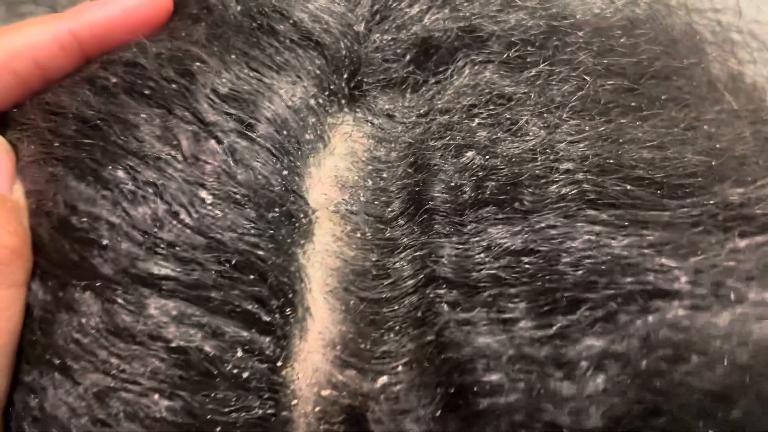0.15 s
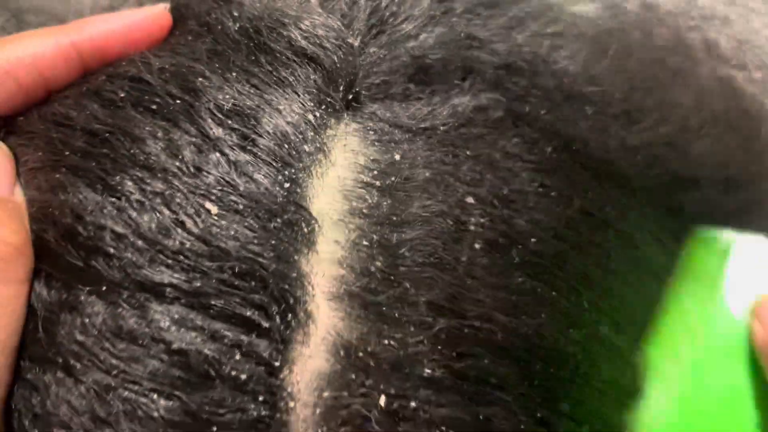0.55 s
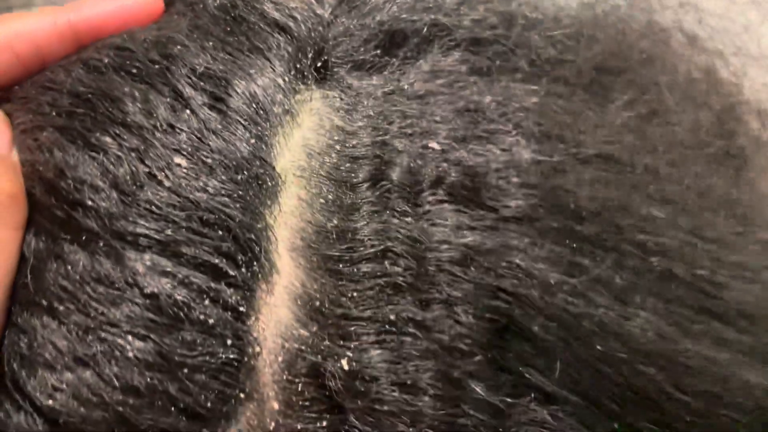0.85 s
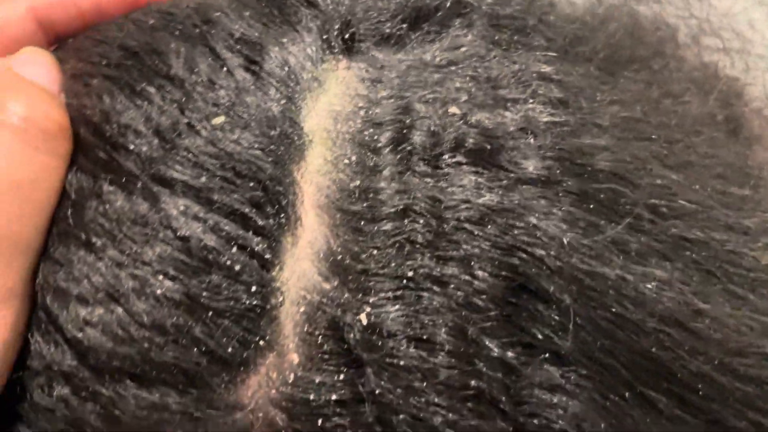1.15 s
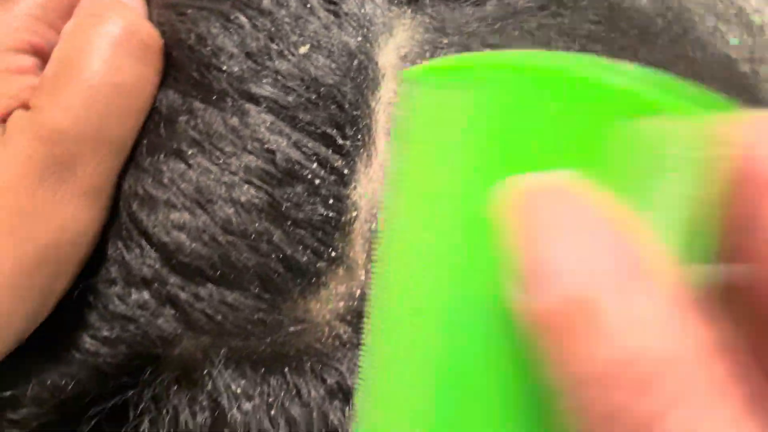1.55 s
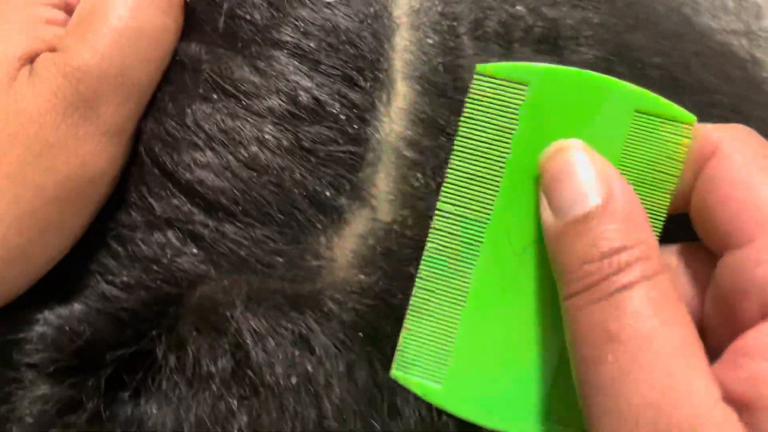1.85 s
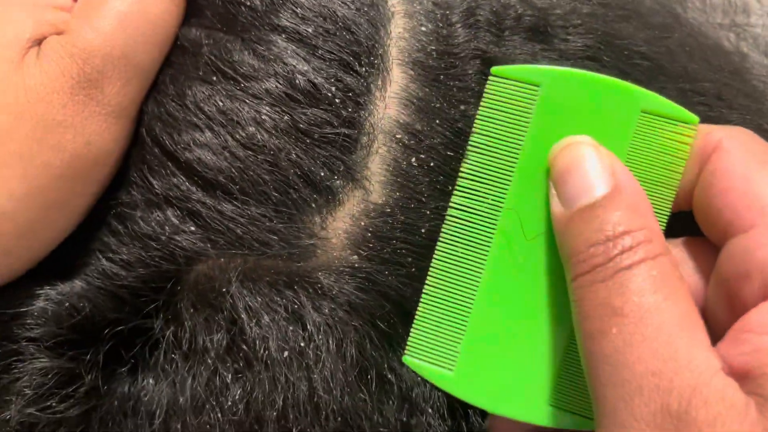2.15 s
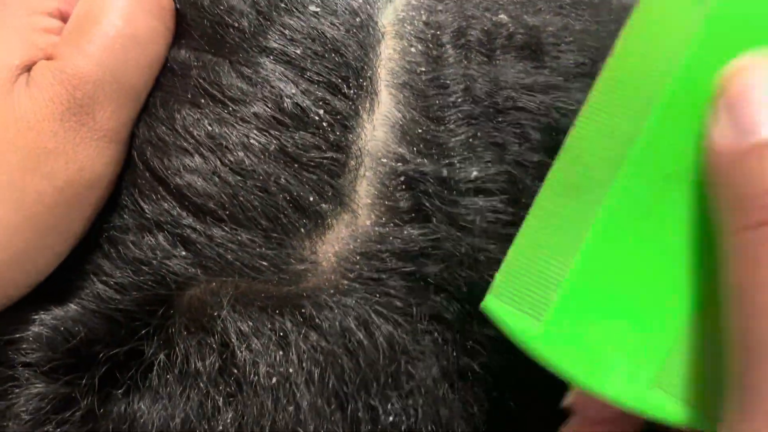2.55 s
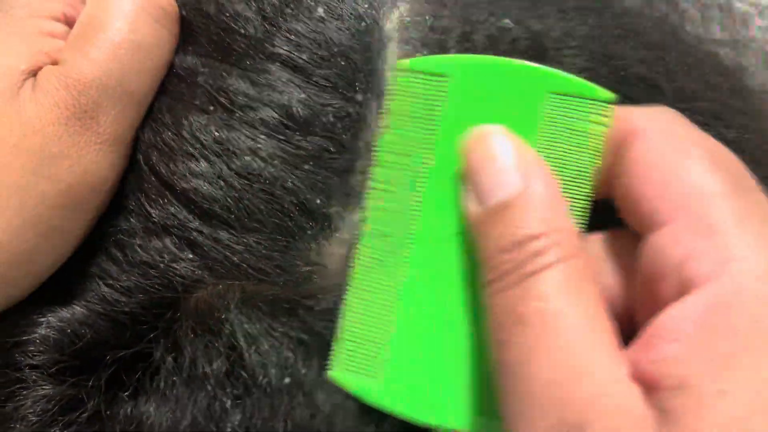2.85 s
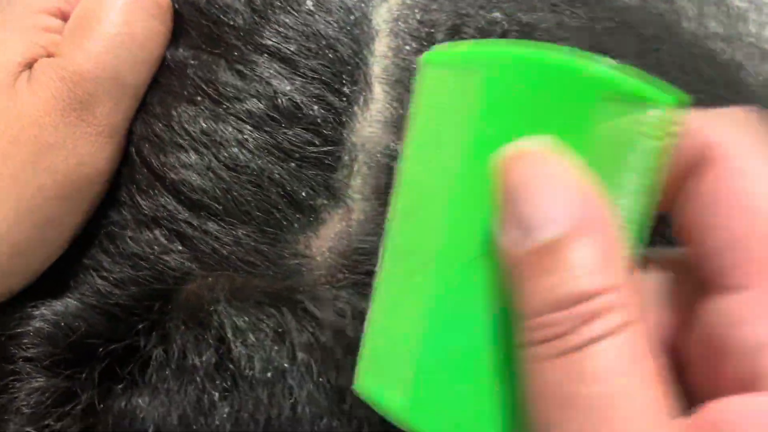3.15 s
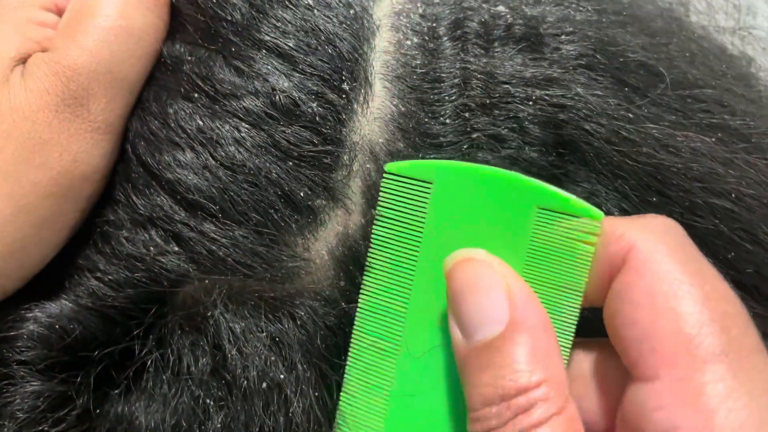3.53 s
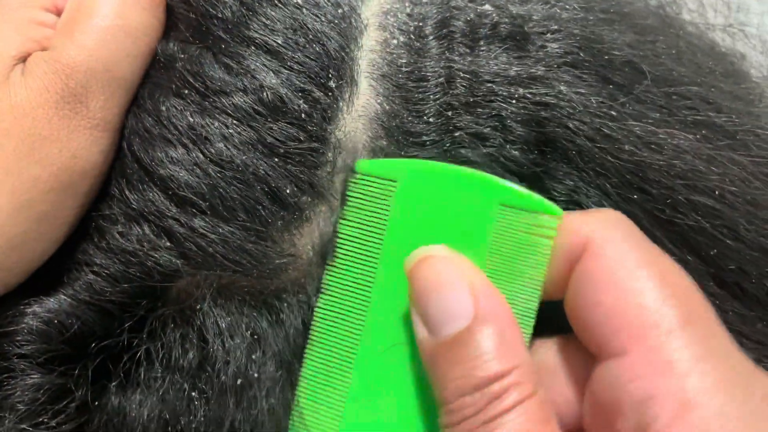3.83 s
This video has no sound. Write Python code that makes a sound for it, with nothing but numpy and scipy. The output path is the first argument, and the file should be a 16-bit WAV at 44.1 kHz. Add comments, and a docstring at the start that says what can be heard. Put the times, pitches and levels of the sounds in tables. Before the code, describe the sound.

A fine plastic comb makes one soft swishing pull through hair, then two brief, clicky scratches on the scalp with faint touches between, heard very close in stereo in a quiet room with low hum and hiss.

```python
"""In a quiet room, a fine plastic comb is drawn through hair, then scratches twice over the scalp.
Between these, hair brushes lightly and fainter touches follow. Hair and teeth are made of many random
clicks, coloured by filters and placed at two nearby microphone openings. The room is shaped noise for a
dull hiss, a passing rumble and far traffic, plus two low sine hums that waver in pitch and level."""
import sys
import numpy as np
from scipy import signal
from scipy.fft import rfft, irfft, next_fast_len
from scipy.io import wavfile
from scipy.ndimage import uniform_filter1d

SR = 44100
rng = np.random.default_rng(int(sys.argv[2]) if len(sys.argv) > 2 else 0)


def transcribe(signal):
    """Save signal, clipped to [-1, 1], as a 16-bit WAV file at the path in sys.argv[1]."""
    frames = np.atleast_2d(signal).T
    limited = np.clip(frames, -1, 1)
    pcm = np.round(limited * 32767).astype(np.int16)
    wavfile.write(sys.argv[1], SR, pcm)


N = 175959  # length in samples
FFT_SIZE = next_fast_len(N + 8192)  # room for phase shifts to spread past the end

# Tone tables give relative strength only: the sound is brought to a standard strength afterwards.
# Dull hiss of the room: pitch_hz, relative_db
HISS_TONE = [(22, -44), (32, -26), (50, -10.5), (72, -2.5), (94, -6.5), (130, -11), (249, -10.5),
             (451, -12), (548, -14.5), (590, -17.5), (1040, -27), (1290, -25.5), (1890, -34), (2760, -40),
             (3250, -48), (6380, -53.5), (7500, -59.5), (10000, -65.5), (12200, -67), (13300, -80),
             (15500, -74)]
# Passing rumble, loudness over time: time_s, level_db
RUMBLE_LEVEL = [(0.0, -70), (.7, -60.5), (1.0, -55), (1.3, -52), (1.7, -65.5), (2.1, -72), (3.99, -83.5)]
# Passing rumble, tone: pitch_hz, relative_db
RUMBLE_TONE = [(30, -41), (45, 3.5), (65, -7), (90, 19), (120, 13), (170, -4), (260, -51)]
# Far traffic, loudness over time: time_s, level_db
FAR_TRAFFIC_LEVEL = [(0.0, -60), (.6, -59.5), (1.3, -69.5), (2.1, -67), (3.3, -71.5), (3.99, -61.5)]
# Far traffic, tone: pitch_hz, relative_db
FAR_TRAFFIC_TONE = [(90, -40), (150, 4), (300, 17.5), (540, 4.5), (600, -2.5), (1500, -48)]
# Room noise at the two openings: pitch_hz, left_minus_right_db, likeness (-1 to 1)
ROOM_PORTS = [(40, -1.5, .8), (125, -2.8, .55), (300, -2.2, .25), (600, -2.2, -.3), (1000, -3.5, -.5),
              (2000, -5, -.3), (4000, -6, .15), (7000, -5, .1), (8500, -2, -.1), (10500, -1.5, .75),
              (12800, -1.5, -.1), (15500, -1.5, .55)]
# Lower hum, loudness over time: time_s, level_db
LOW_HUM_LEVEL = [(0.0, -66), (0.07, -57), (0.39, -51), (0.78, -67), (0.87, -54), (1.57, -57.5), (1.93, -54),
                 (2.02, -63.5), (2.23, -61.5), (2.3, -69), (2.549, -53), (2.83, -56), (3.05, -71),
                 (3.589, -53.5), (3.71, -81), (3.99, -56)]
# Higher hum, loudness over time: time_s, level_db
HIGH_HUM_LEVEL = [(0.0, -52.5), (0.18, -43.5), (0.34, -64), (0.44, -43), (0.65, -55.5), (0.71, -45),
                  (0.99, -48.5), (1.04, -61.5), (1.24, -49.5), (1.79, -70), (2.12, -60), (2.18, -84),
                  (2.69, -53.5), (2.81, -75), (3.79, -61.5), (3.99, -79)]
# Loose hair, one curve per touch, before its overall gain: time_s, level_db
BRUSH_LEVELS = [
    [(0, -71), (.026, -70.5), (.075, -85), (.13, -82), (.32, -89.5), (.36, -105)],
    [(.38, -100), (.43, -66), (.72, -73.5), (.83, -72), (.91, -100)],
    [(1.58, -105), (1.615, -90), (1.628, -73), (1.652, -90), (1.68, -94)],
    [(2.34, -103), (2.375, -90), (2.4, -88), (2.44, -73), (2.506, -94), (2.57, -108)],
    [(3.24, -108), (3.286, -87), (3.322, -88), (3.44, -102)],
    [(3.7, -105), (3.832, -84), (3.86, -99), (3.88, -80), (3.95, -98), (3.99, -86)],
]
# Loose hair, tone: pitch_hz, relative_db
BRUSH_TONE = [(1500, -10), (3000, -1), (4500, -21), (6500, 0.5), (8800, -16), (10300, -1.5), (11500, 0.5),
              (13000, -4.5), (15500, 0)]
# Long pull through the hair, before its overall gain: time_s, level_db
STROKE_LEVEL = [(.39, -106), (.44, -65.5), (.5, -53), (.546, -54.5), (.575, -54.5), (.6, -55), (.686, -56),
                (.71, -59.5), (.79, -69.5), (.86, -89)]
# Long pull, tone: pitch_hz, relative_db
STROKE_TONE = [(600, -24), (1100, -7.5), (1600, -6.5), (1950, 3.5), (2300, -4), (2750, -7), (3300, -6.5),
               (4000, -10.5), (5400, -9.5), (6100, 0), (6900, -3), (8000, -13), (10000, -14),
               (13000, -16.5), (15500, -6.5)]
# Long pull, boost of its low band against the rest: time_s, boost_db
STROKE_LOW_BOOST = [(.45, 1), (.51, -2), (.59, 3), (.66, 0.5), (.75, -1)]
# Long pull at the two openings: pitch_hz, left_minus_right_db, left_lead_rad, likeness (0 to 1)
STROKE_PORTS = [(800, 4, 3.5, 0.4), (2140, -8.5, 4.5, 0.78), (3230, -6.5, 1.2, 0.6), (4000, -13, -0.5, .45),
                (5040, -8, -6, 1), (6700, -15, -6, 1), (6850, -7.5, -5, 1), (9100, 2, -2.5, 0.99),
                (9900, 2, -1.8, 1), (9900, -7, 0, .97), (11900, 4.5, 1.5, 1), (13300, -8, 5.5, .97),
                (14300, 5, 2, 1), (15200, -4, 8, 0.9)]
# Teeth on the scalp, one curve per scrape, before the overall gain: time_s, level_db
SCRATCH_LEVELS = [
    [(1.66, -88), (1.702, -61.5), (1.732, -53), (1.768, -61), (1.776, -67.5), (1.795, -65), (1.91, -66.5),
     (1.93, -72), (1.95, -74), (2.02, -94)],
    [(2.4, -87), (2.445, -72.5), (2.5, -79), (2.55, -103)],
    [(2.8, -79), (2.843, -73.5), (2.868, -50.5), (2.905, -55.5), (2.928, -65), (2.946, -64), (2.962, -59),
     (3.01, -71), (3.09, -95)],
    [(3.79, -92), (3.83, -73.5), (3.862, -83), (3.878, -67), (3.9, -72.5), (3.922, -69), (3.948, -79),
     (3.99, -88)],
]
# The comb's own tone: pitch_hz, relative_db
COMB_TONE = [(1000, -28), (1900, -0.5), (2550, -10.5), (3200, 1.5), (4200, 0), (5300, -4), (5900, -8.5),
             (6500, -5), (7300, -11.5), (8300, -8), (9500, -8.5), (12000, -12), (14000, -15), (15600, -5.5)]
# Teeth springing free, before band gains and filters: start_s, peak_db, treble_boost_db
TICKS = [(1.6817, -48, -5), (1.697, -38, -12), (1.704, -45, -5), (1.7093, -42, 7), (1.726, -44, -6),
         (1.7293, -44, -4), (1.7319, -46, 17), (1.744, -42, -3), (1.754, -36, -7), (1.765, -40, 4),
         (1.797, -40, 3), (1.810, -45, -5), (1.814, -46, -6), (1.826, -56, -8), (1.8415, -56, -8),
         (1.8545, -54, -8), (1.858, -45, -3), (1.8807, -45.5, 2), (1.9167, -38, 3.5), (1.943, -55, 10),
         (2.3705, -70, 9), (2.846, -40, -8), (2.858, -38.5, -6), (2.864, -39, -5), (2.869, -33.5, -6),
         (2.874, -44, -12), (2.88, -44, -7), (2.8865, -42, -9), (2.894, -39, -7), (2.898, -37.5, 7),
         (2.902, -41, 5), (2.9097, -42, -3), (2.9527, -38, -10), (2.958, -44, -9), (2.969, -44, -19),
         (3.871, -53, 13), (3.876, -48, 1), (3.912, -55, -4), (3.9254, -45.5, -11), (3.956, -45, -7)]
# Other near sounds at the two openings: pitch_hz, left_minus_right_db, left_lead_rad, likeness (0 to 1)
NEAR_PORTS = [(800, -2, 3.1, .5), (2000, -6, 3.3, .65), (3000, -9, 2.2, .72), (4000, -11, .8, .68),
              (5100, -7, .1, .65), (5700, -4, -.8, .3), (7000, -2, -3.3, .25), (8200, 0, -3.0, .8),
              (10500, 0, 0, .9), (12000, 0, 2.0, .72), (13200, 0, 3.2, .92), (14200, 0, 4.5, .65),
              (15600, 0, 6.3, .92)]


def gain_of(db):
    """Turns decibels into a plain multiplier."""
    return 10 ** (np.asarray(db) / 20)


def evened(x):
    """Scales a signal to an average (RMS) strength of 1."""
    return x / np.sqrt(np.mean(x ** 2) + 1e-20)


def read(points, hz, column=1):
    """Reads a table column at any pitch, with pitch spaced by ratio."""
    table = np.array(points, float)
    return np.interp(np.log(hz + 1), np.log(table[:, 0] + 1), table[:, column])


def level(*curves):
    """Gain over time from one or more level curves, silent outside them."""
    t = np.arange(N) / SR
    total = np.zeros(N)
    for curve in curves:
        time_s, level_db = np.transpose(curve)
        total += gain_of(np.interp(t, time_s, level_db, left=-200, right=-200))
    return uniform_filter1d(total, size=64)


def room_noise(tone, patchy_db):
    """Room sound as random short-time spectra with faint patches, partly alike at the two openings."""
    frames, hz = N // 512 + 5, np.fft.rfftfreq(2048, 1 / SR)
    a, b, c, d, patches = rng.standard_normal((frames, 1025, 5)).T
    patches = uniform_filter1d(patches, size=16, axis=0)  # smooth over pitch
    patches = evened(uniform_filter1d(patches, size=6, axis=1))  # smooth over time
    likeness = np.clip(read(ROOM_PORTS, hz, column=2), -1, 1)[:, None]
    right = a + 1j * b
    left = likeness * right + np.sqrt(1 - likeness ** 2) * (c + 1j * d)
    left = left * gain_of(read(ROOM_PORTS, hz))[:, None]
    spectra = np.array([left, right]) * gain_of(read(tone, hz)[:, None] + patchy_db * patches)
    return evened(signal.istft(spectra, nperseg=2048, noverlap=1536)[1][:, :N])


def hiss():
    """The steady dull hiss of the room: noise that is weaker toward the treble."""
    return gain_of(-52.5) * room_noise(HISS_TONE, patchy_db=1.63)


def traffic():
    """A passing rumble and far traffic: two low noises, each with its own swell."""
    rumble = level(RUMBLE_LEVEL) * room_noise(RUMBLE_TONE, patchy_db=3.5)
    far = level(FAR_TRAFFIC_LEVEL) * room_noise(FAR_TRAFFIC_TONE, patchy_db=2.7)
    return rumble + far


def hum(pitch_hz, curve, waver_hz):
    """A low sine tone whose pitch drifts a little, slightly stronger on the right."""
    drift = uniform_filter1d(rng.standard_normal(N), size=9000)
    drift = evened(uniform_filter1d(drift, size=9000))
    turns = np.cumsum(pitch_hz + waver_hz * drift) / SR + rng.random()
    tone = np.sqrt(2) * level(curve) * np.sin(2 * np.pi * turns)
    left_minus_right_db = -2.2
    return tone * gain_of([[left_minus_right_db / 2], [-left_minus_right_db / 2]])


def grains(per_s, spread_db):
    """Hairs slipping past the teeth: random clicks, a few of them large."""
    size = gain_of(spread_db * np.minimum(rng.exponential(1, N), 5))
    happens = rng.random(N) < per_s / SR
    return evened(size * rng.standard_normal(N) * happens)


def flutter(rate_hz, depth_db):
    """Uneven grip: a gain that wanders at random, smoothed over 1 / rate_hz seconds."""
    wander = uniform_filter1d(rng.standard_normal(N), size=max(int(SR / rate_hz), 2))
    return gain_of(depth_db * evened(wander))


def colour(x, tone):
    """Rings each slip through a tone, twice: as it is, and with random signs for scattered paths."""
    hz = np.fft.rfftfreq(2048, 1 / SR)
    log_gain = np.log(gain_of(read(tone, hz)))
    mirrored = np.r_[log_gain, log_gain[-2:0:-1]]
    # Minimum phase: the filter reacts as early as it can, and never before the slip.
    taps = np.fft.ifft(np.exp(np.conj(signal.hilbert(mirrored)))).real[:1024]
    taps = taps / np.linalg.norm(taps)
    pair = np.array([x, x * rng.choice([-1., 1.], N)])
    return signal.oaconvolve(pair, taps[None], axes=1)[:, :N]


def patchy(pair, depth_db, size):
    """Hairs and teeth change their contact: patches of the spectrum swell and fade on their own."""
    spectra = signal.stft(pair, nperseg=256, noverlap=192)[2]
    _, bands, frames = spectra.shape
    patches = uniform_filter1d(rng.standard_normal((frames, bands)).T, size=4, axis=0)
    patches = uniform_filter1d(patches, size=size, axis=1)
    gain = evened(gain_of(depth_db * evened(patches)))
    return signal.istft(spectra * gain, nperseg=256, noverlap=192)[1][:, :N]


def ports(pair, table):
    """Near sound at two openings: level and phase differ; the left also hears paths off hair and hand."""
    hz = np.fft.rfftfreq(FFT_SIZE, 1 / SR)
    pitch_hz, *columns = np.array(table).T
    db, lead_rad, likeness = (np.interp(hz, pitch_hz, column) for column in columns)
    likeness = np.clip(likeness, 0, 1)
    direct, scattered = rfft(pair, FFT_SIZE)
    mixed = likeness * direct + 1j * np.sqrt(1 - likeness ** 2) * scattered
    left = gain_of(db) * np.exp(1j * lead_rad) * mixed
    return irfft(np.array([left, direct]), FFT_SIZE)[:, :N]


def brushes():
    """Light touches of comb and hand on loose hair: many small slips with an uneven grip."""
    slips = flutter(49.0, 2.6) * grains(9000., 0.67)
    return colour(gain_of(3.5) * level(*BRUSH_LEVELS) * slips, BRUSH_TONE)


def stroke():
    """Dense fine friction of many hairs along the teeth; its low band varies with the load on the comb."""
    slips = flutter(83.0, 0.78) * grains(12000., 1.0)
    rub = colour(gain_of(5.5) * level(STROKE_LEVEL) * slips, STROKE_TONE)
    lows = signal.filtfilt(*signal.butter(3, 2600, fs=SR), rub)
    time_s, boost_db = np.transpose(STROKE_LOW_BOOST)
    lows_gain = gain_of(np.interp(np.arange(N) / SR, time_s, boost_db))
    return patchy(rub - lows + lows_gain * lows, depth_db=2.0, size=14)


def scratches():
    """Teeth chatter on the scalp: sparse slips over a fine rasp, through the comb's tone."""
    chatter = gain_of(-6.0) * grains(700., 2.1)
    rasp = gain_of(-2.0) * flutter(300., 2.3) * grains(12000., 2.5)
    drive = gain_of(4.0) * level(*SCRATCH_LEVELS) * (chatter + rasp)
    return patchy(colour(drive, COMB_TONE), depth_db=2.0, size=3)


def ticks():
    """Single teeth snap free: a click and a short rattle through the comb's tone, treble set per tick."""
    length, rattle_t60_s = 88, 0.0018  # samples; seconds to die away by 60 dB
    low, high, t = np.zeros(N), np.zeros(N), np.arange(length) / SR
    bursts = 0.34 * rng.standard_normal((len(TICKS), length)) * gain_of(-60 * t / rattle_t60_s)
    bursts[:, 0] = 1  # the click itself
    for (start_s, peak_db, treble_db), burst in zip(TICKS, bursts):
        at = round(start_s * SR)
        low[at:at + length] += gain_of(peak_db + 6) * burst
        high[at:at + length] += gain_of(peak_db + 8 + treble_db) * burst
    split = signal.butter(2, 7300, fs=SR)  # where bass and treble part
    bass = signal.filtfilt(*split, colour(low, COMB_TONE))
    softened = signal.lfilter(*signal.butter(2, 14000., fs=SR), colour(high, COMB_TONE))
    treble = softened - signal.filtfilt(*split, softened)
    return bass + treble


def scene():
    """Adds the room, the two hums and the near sounds of comb and hair."""
    room = hiss() + traffic()
    hums = hum(57.28, LOW_HUM_LEVEL, waver_hz=0.79) + hum(78.65, HIGH_HUM_LEVEL, waver_hz=0.67)
    near = ports(brushes() + scratches() + ticks(), NEAR_PORTS) + ports(stroke(), STROKE_PORTS)
    return room + hums + near


def record(dry):
    """Cuts off everything above a steep upper edge in pitch."""
    edge_hz = 15790
    low_pass = signal.firwin(1023, edge_hz, window=("kaiser", 9), fs=SR)
    return signal.oaconvolve(dry, low_pass[None], "same")


dry = scene()
out = record(dry)
transcribe(out)
```